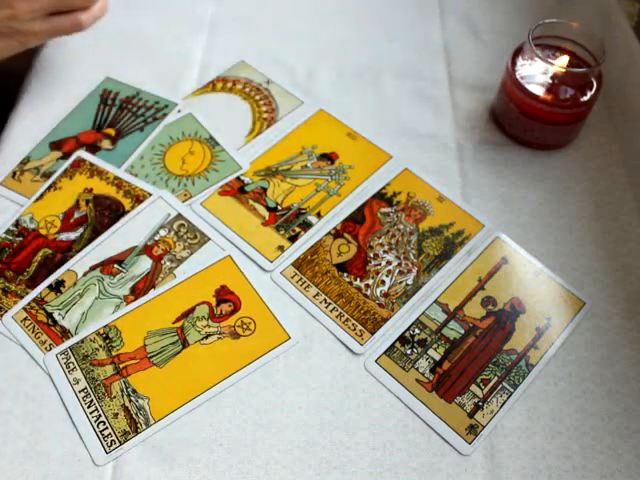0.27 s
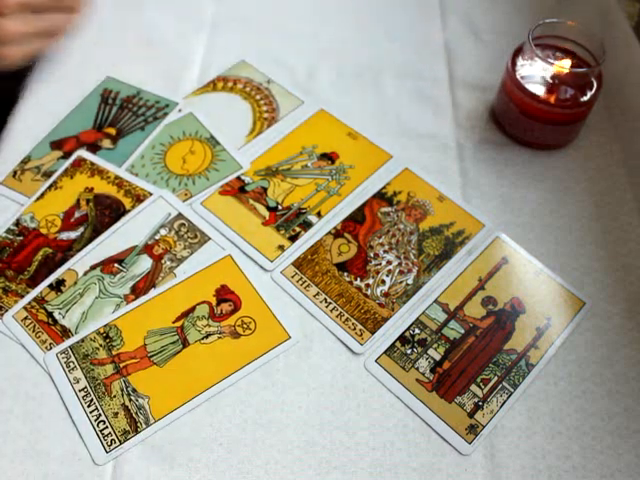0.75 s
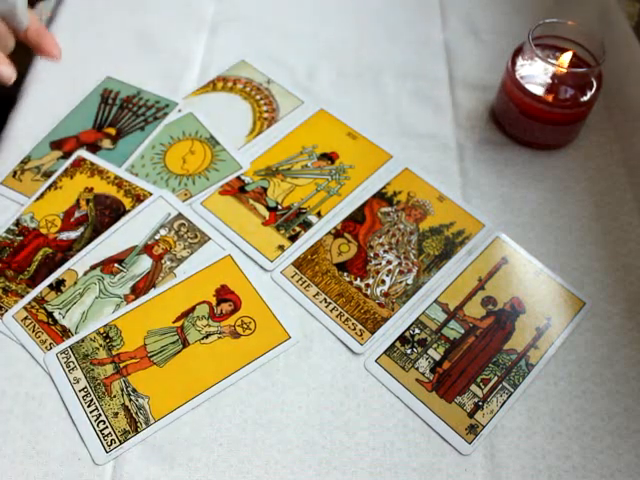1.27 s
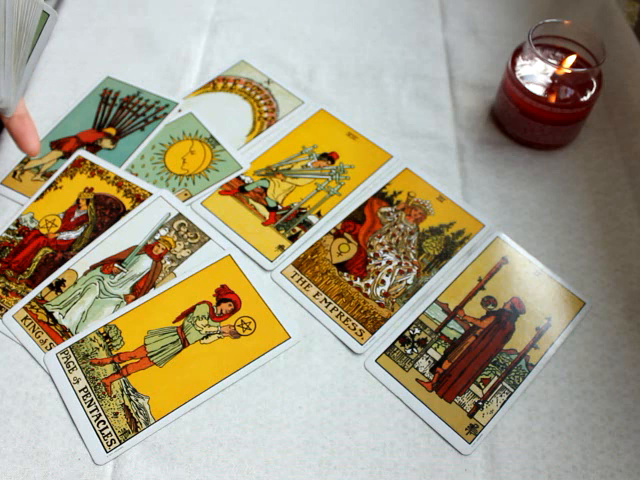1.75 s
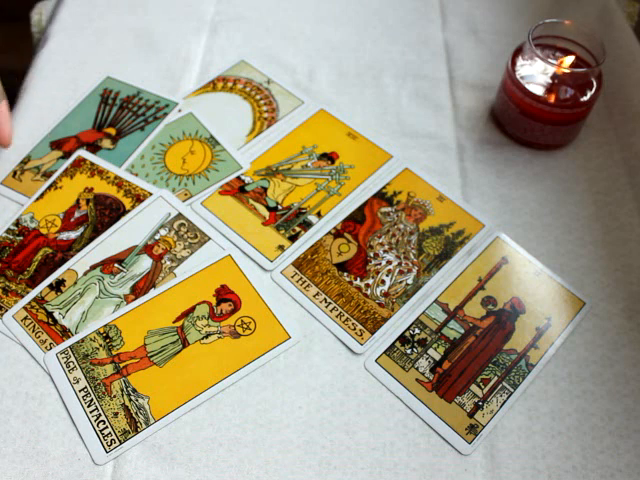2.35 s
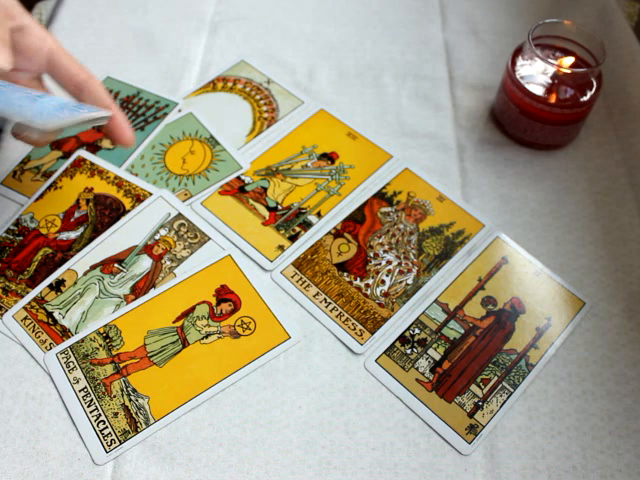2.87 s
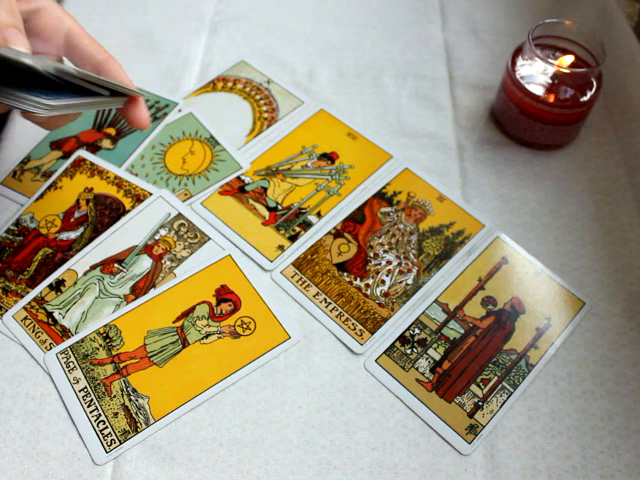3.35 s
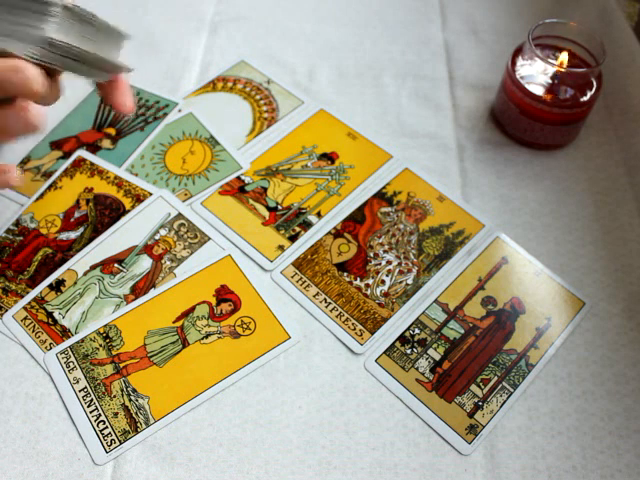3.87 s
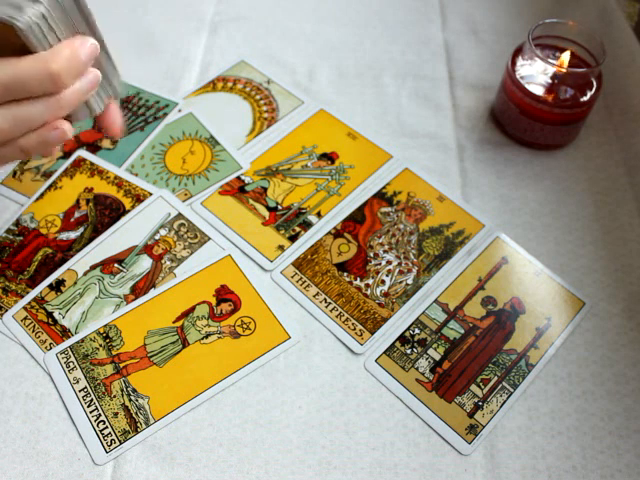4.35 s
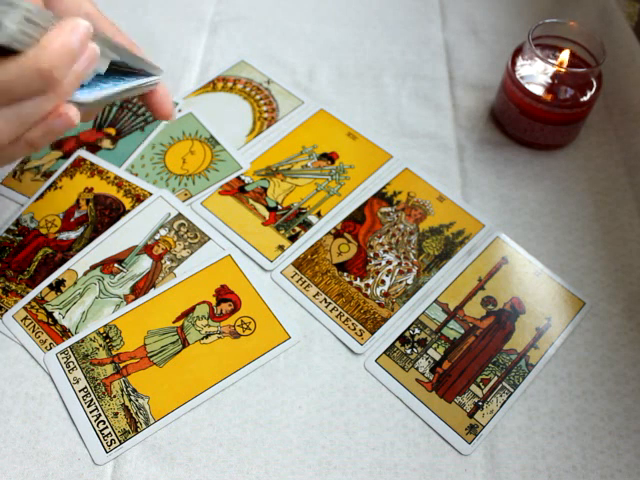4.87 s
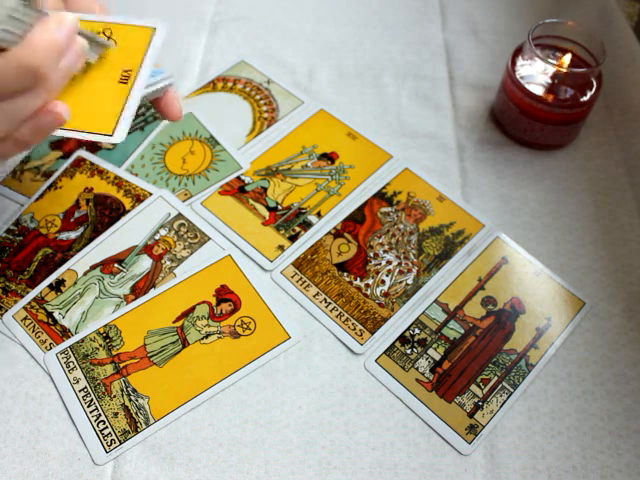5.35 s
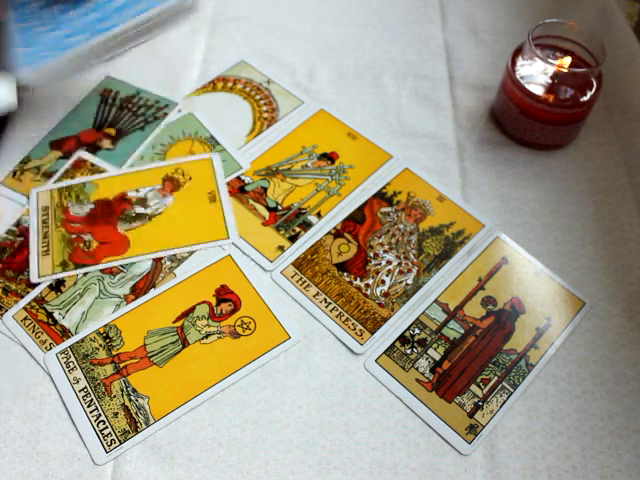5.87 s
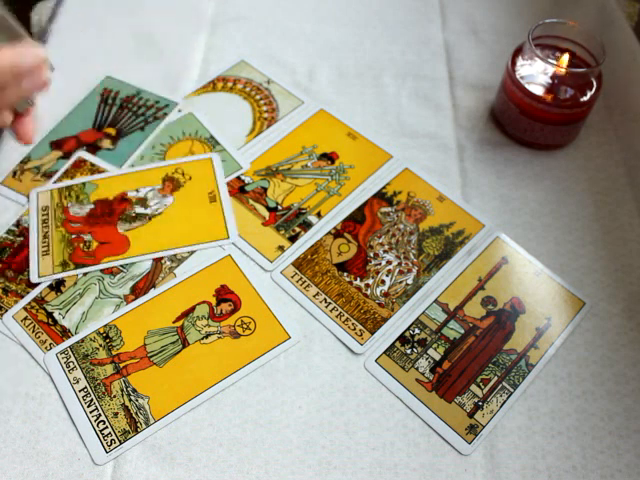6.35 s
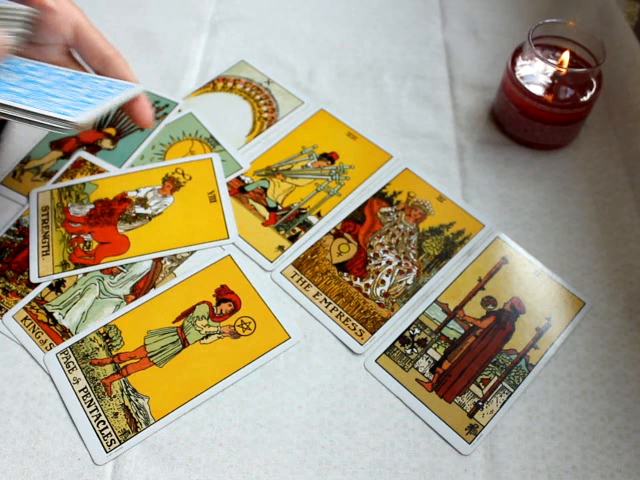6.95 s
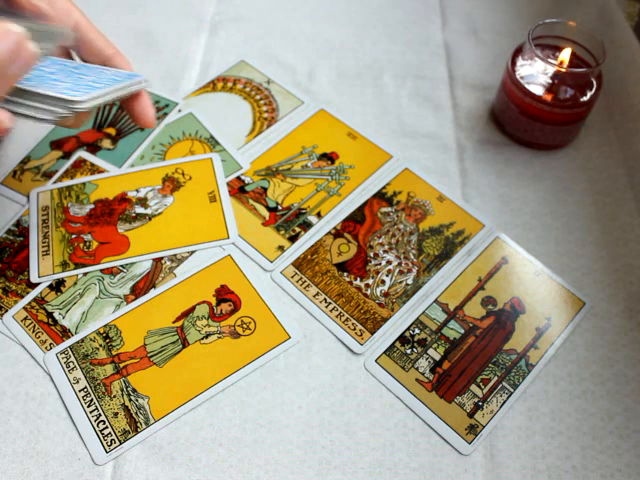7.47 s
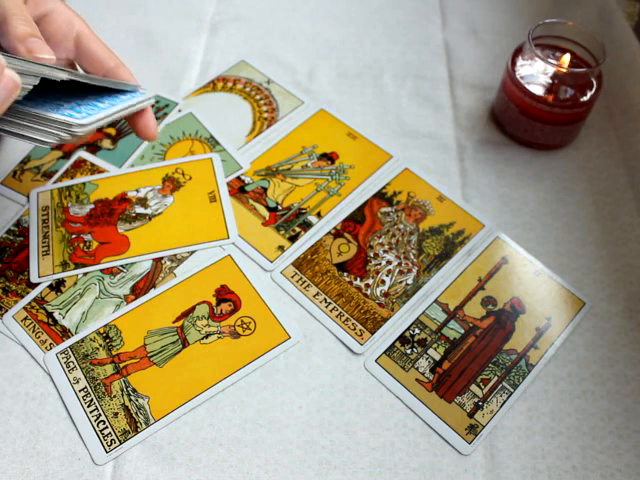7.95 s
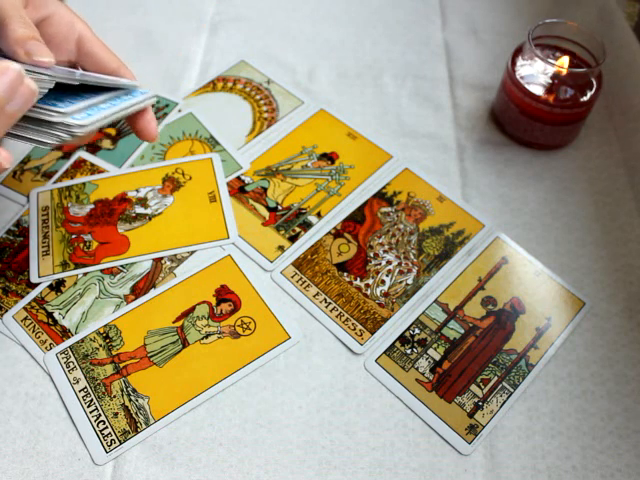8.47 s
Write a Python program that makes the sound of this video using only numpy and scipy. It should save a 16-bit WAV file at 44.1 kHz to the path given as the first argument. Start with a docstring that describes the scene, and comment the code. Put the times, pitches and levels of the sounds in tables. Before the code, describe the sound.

In a small quiet room, a deck of cards is knocked once on a cloth-covered table with a dull woody clack. After faint brushes, packets slide and snap together by hand. One card springs out with a sharp, very loud flick, lands with light ticks, and the shuffling continues softly. The microphone is close, with a short room tail and faint hiss.

```python
"""Tarot cards shuffled over a table.

The deck is knocked once on a cloth-covered table in a small room, then shuffled from hand to hand.
Packets slide (shaped friction noise), edges snap (cracks and short flutter), bent cards pop (narrow-band noise).
One card springs out with a loud flick, a run of snaps, and lands on the spread; the shuffling goes on.
The table rings in decaying modes, a noise tail makes the room, and faint coloured noise is the hiss."""
import sys
import numpy as np
from scipy import signal
from scipy.fft import rfft, irfft
from scipy.io import wavfile
from scipy.ndimage import uniform_filter1d, minimum_filter1d

SR = 44100
rng = np.random.default_rng(int(sys.argv[2]) if len(sys.argv) > 2 else 0)


def put_to_file(sound):
    """Save the sound as 16-bit audio at rate SR, in the file named by the first command-line argument."""
    columns = np.atleast_2d(sound).T  # one column per channel
    safe = np.clip(columns, -1, 1)
    whole_steps = np.round(safe * 32767)
    wavfile.write(sys.argv[1], SR, whole_steps.astype(np.int16))


N = 384111

# packets dropping into the deck: (touch time [s], fall [s], touch level [dB], rub level [dB],
# landing level [dB], brightness [dB/octave], body below about 1 kHz [dB])
PACKET_DROPS = [(3.1039, 0.018, -31.5, -28, -24, 2, -4.5), (3.516, 0.028, -33, -42.5, -36, 1.5, 12.5),
                (3.7208, 0.0093, -38.5, -38, -32.5, 5, -2), (4.907, 0.0084, -45, -38, -18.5, 3.5, 8.5),
                (6.0714, 0.016, -37.5, -28.5, -25, 5.5, 2), (7.113, 0.016, -32.5, -34, -29, 1.5, 3.5),
                (7.3166, .0198, -39, -56, -43.5, 4, -3), (7.5743, 0.012, -38.5, -48, -33.5, 3, 11),
                (8.148, .0146, -29, -57, -26.5, 2, -11), (8.3791, 0.0054, -43, -38, -38, 4, 5)]

EDGES_HZ = np.geomspace(125, 16000, 15)   # half octaves
CENTRES_HZ = np.sqrt(EDGES_HZ[1:] * EDGES_HZ[:-1])
BANK = [signal.butter(2, pair, "band", fs=SR, output="sos") for pair in zip(EDGES_HZ, EDGES_HZ[1:])]
CUTOFF_HZ = 16000

FLICK_S = (5.2327, 5.2596)   # first skip, last skip
FLICK_BODY_DB = (14, -6)     # first skip, last skip


def from_db(db):
    """Decibels to gain."""
    return 10 ** (np.asarray(db) / 20)


def unit(x):
    """Scale to an energy of one."""
    return x / np.sqrt(np.sum(x ** 2, axis=-1, keepdims=True) + 1e-20)


def at_hz(points, hz):
    """Read a spectrum on a log-frequency axis."""
    points = np.array(points)
    return np.interp(np.log(hz), np.log(points[:, 0]), points[:, 1])


def clock(length_s):
    """Sample times over a stretch of seconds."""
    return np.arange(int(length_s * SR)) / SR


def fade(t, t60_s):
    """Exponential decay by 60 dB in t60_s."""
    return np.exp(-np.log(1000) * t / np.maximum(t60_s, 1e-3))


def add(out, start_s, sound):
    """Mix a sound in at a given time."""
    at = max(int(start_s * SR), 0)
    out[at:at + len(sound)] += sound[:len(out) - at]


def bands(force):
    """Split a force into half octaves of equal energy; alternate signs join neighbours smoothly."""
    return unit(np.array([signal.sosfilt(sos, force) * (-1) ** k for k, sos in enumerate(BANK)]))


def coloured(force, band_db, size=2048):
    """A force heard through a body that answers at once (minimum phase), scaled to unit energy."""
    hz = np.maximum(np.fft.rfftfreq(size, 1 / SR), 1)
    band_width_db = 10 * np.log10(np.maximum(hz, CENTRES_HZ[0]))
    per_hz_db = at_hz(np.c_[CENTRES_HZ, band_db], hz) - band_width_db
    cepstrum = irfft(np.log(from_db(per_hz_db)))
    causal = np.r_[cepstrum[0], 2 * cepstrum[1:size // 2]]
    answer = irfft(np.exp(rfft(causal, size)))
    sound = signal.fftconvolve(force, answer)[:len(force)]
    # small things radiate hardly any bass
    band_pass = signal.butter(3, [CENTRES_HZ[0], CUTOFF_HZ], "band", fs=SR, output="sos")
    return unit(signal.sosfilt(band_pass, sound))


def background(level_db=-55.5):
    """Steady room air and microphone hiss: coloured noise with nothing below 20 Hz."""
    # hiss spectrum: (frequency [Hz], relative density [dB per Hz])
    hiss_colour = [(25, -12), (42, -15.5), (65, -19), (100, -20), (165, -12), (205, -15.5), (228, -10.5),
                   (270, -15), (600, -12.5), (1000, -12), (2400, -13), (5000, -16), (10000, -21),
                   (15800, -20)]
    hz = np.maximum(np.fft.rfftfreq(N, 1 / SR), 1)
    gain = from_db(at_hz(hiss_colour, hz)) * (hz > 20)
    noise = irfft(rfft(rng.standard_normal(N)) * gain, N)
    return from_db(level_db) * np.sqrt(N) * unit(noise)


def room(x, first_echo_s=0.0036):
    """Diffuse reflections: a short noise tail with its own level and decay in each band."""
    # tail level: (frequency [Hz], level [dB])
    tail_level = [(150, -7.5), (600, -6), (1600, -7.5), (4000, -7.5), (8000, -10), (14000, -15)]
    # tail decay: (frequency [Hz], t60 [s])
    tail_decay = [(150, 0.21), (1600, 0.24), (4000, 0.22), (8000, 0.2), (14000, 0.2)]
    t = clock(.4)
    build = 1 - np.exp(-(t / first_echo_s) ** 2)
    band_t60_s = at_hz(tail_decay, CENTRES_HZ)[:, None]
    tails = bands(rng.standard_normal(len(t))) * fade(t, band_t60_s) * build
    width_share = np.sqrt(np.diff(EDGES_HZ) / SR)
    band_gain = from_db(at_hz(tail_level, CENTRES_HZ)) * width_share
    return signal.fftconvolve(x, band_gain @ unit(tails))[:N]


def knocks(crack_db=-1.5, clack_db=20, clack_t60_s=0.088, rattle_db=18, rattle_t60_s=0.36,
           damping_hz=3500, build_cycles=1.6):
    """A dull clack of contact, then table modes (low ones build slower) and a dense wooden rattle."""
    # blows that reach the table top: (time [s], level [dB])
    blows = [(0.5013, -15), (5.697, -43)]
    # table-top modes: (frequency [Hz], relative level [dB], t60 [s])
    modes = [(220, -23, 0.24), (238, -11.5, 0.13), (351, -6.5, 0.24), (370.8, -2, 0.21), (484, -15.5, 0.18),
             (528, -5.5, 0.16), (699, -8, 0.12), (876, -6, 0.18), (962, -6.5, 0.22), (1011, 2, 0.16),
             (1170, -10, 0.18), (1213, -10, 0.13), (1270, -22, 0.12), (1259, 1.5, 0.055),
             (1410, -12, 0.089), (1605, -8, 0.096), (1835, -19, 0.26), (1850, -16.5, 0.2),
             (2380, -43, 0.18), (2630, -17.5, 0.11), (2810, -15, 0.074)]
    # contact colour: (frequency [Hz], relative level [dB per half octave])
    clack_colour = [(148, -42), (300, -29), (600, -6.5), (1200, -2.5), (1700, -4.5), (2400, -8.5),
                    (3400, -12.5), (4750, -32), (9500, -46)]
    # rattle colour: (frequency [Hz], relative level [dB per half octave])
    rattle_colour = [(100, -24), (148, -27), (210, -4), (300, 1), (600, 0.5), (1200, 10.5), (1700, 7),
                     (2400, -4), (3400, -36), (9500, -81)]
    out, t = np.zeros(N), clock(.4)
    band_t60_s = rattle_t60_s / (1 + (CENTRES_HZ[:, None] / damping_hz) ** 2)   # wood damps treble first
    for s, db in blows:
        ring = np.zeros(len(t))
        for hz, mode_db, t60_s in modes:
            build = 1 - np.exp(-t * hz / build_cycles)
            tone = np.sin(2 * np.pi * (hz * t + rng.random()))
            ring += from_db(mode_db) * fade(t, t60_s) * build * tone
        contact = unit(rng.standard_normal(len(t)) * fade(t, clack_t60_s))
        contact[0] = from_db(crack_db)
        clack = coloured(contact, at_hz(clack_colour, CENTRES_HZ))
        dying = np.sqrt(np.diff(EDGES_HZ)) @ (bands(rng.standard_normal(len(t))) * fade(t, band_t60_s))
        rattle = coloured(dying, at_hz(rattle_colour, CENTRES_HZ))
        add(out, s, from_db(db) * (ring + from_db(clack_db) * clack + from_db(rattle_db) * rattle))
    return out


def card_colour(brightness_db, body_db):
    """A thin free edge sounds bright; a thick packet adds body."""
    # card colour: (frequency [Hz], relative level [dB per half octave])
    plain_card = [(148, -39.5), (297, -33), (594, -22.5), (1189, -13), (1800, -9), (2400, -6), (3400, -8.5),
                  (4750, -10), (6700, -11.5), (9500, -16.5), (13500, -20)]
    octaves_up = np.maximum(np.log2(CENTRES_HZ / 2500), 0)
    low_share = 1 / (1 + (CENTRES_HZ / 1100) ** 3)
    return at_hz(plain_card, CENTRES_HZ) + brightness_db * octaves_up + body_db * low_share


def all_slides(rise_share=0.34, packet_rub_after_s=0.019, flick_rub_after_s=0.0085):
    """Free strokes and the rubs of packets and flicked card, which outlast the landing or last skip."""
    # cards sliding over each other: (peak time [s], length [s], level [dB], brightness [dB/octave],
    # body below about 1 kHz [dB])
    free_strokes = [(1.273, 0.45, -57.5, 1.5, -10), (1.496, 0.1, -45, -2.5, -5),
                    (3.135, 0.096, -43.5, -2, 4), (3.268, .05, -49, -2, -9), (3.413, 0.13, -48, 0, -1),
                    (3.738, 0.12, -36, 4, 6), (3.883, 0.22, -48.5, 4, 10), (4.197, 0.14, -47.5, 7.5, 3),
                    (4.62, 0.082, -47, 4.5, 2), (5.084, 0.074, -42, 2.5, 1), (5.527, 0.98, -55.5, 1.5, 13),
                    (6.107, 0.053, -28, 2, -6.5), (6.31, 0.13, -50, 4, 4), (6.816, .08, -38.5, 4.5, -17),
                    (7.294, 0.24, -51.5, 1.5, 14), (8.134, 0.18, -48.5, 1, 15)]
    strokes = [(peak - rise_share * length, peak, peak + (1 - rise_share) * length, *sound)
               for peak, length, *sound in free_strokes]
    rubs = [(s, s + fall, s + fall + packet_rub_after_s, rub_db, brightness_db, body_db)
            for s, fall, _, rub_db, _, brightness_db, body_db in PACKET_DROPS]
    # start, peak, end [s], level [dB], brightness [dB/octave], body [dB]
    flick = (*FLICK_S, FLICK_S[1] + flick_rub_after_s, -14, -6, FLICK_BODY_DB[1])
    return strokes + rubs + [flick]


def slides(catches_per_s=4000, spread_db=6.0, smooth=0.43, edge_db=17, uneven_db=3.5, grips_per_s=250):
    """Card faces rub with a smooth hiss and catch in tiny slips; the stroke swells unevenly and dies."""
    out = np.zeros(N)
    grips_s = np.arange(0, N / SR, 1 / grips_per_s)
    grip_db = uneven_db * rng.standard_normal(len(grips_s))
    pressure = from_db(np.interp(np.arange(N) / SR, grips_s, grip_db))
    hiss, size = rng.standard_normal((2, N))
    caught = rng.random(N) < catches_per_s / SR
    slips = caught * from_db(spread_db * np.clip(size, -2, 2)) * rng.choice([-1, 1], N)
    friction = (slips + smooth * hiss) * pressure
    for start, peak, end, db, brightness_db, body_db in all_slides():
        t = start + clock(max(end - start, .01))
        speed = np.interp(t, [start, peak, end], [0, 1, 0])
        loudness = from_db(edge_db * (speed - 1)) - from_db(-edge_db)
        stroke = np.sqrt(speed * loudness.clip(0))
        force = stroke * friction[int(start * SR):][:len(t)]
        rub = coloured(force, card_colour(brightness_db, body_db))
        add(out, start, from_db(db) * np.linalg.norm(stroke) * rub)
    return out


def all_flexes(pop_cycles=28, t60_per_swell=2.6, ring_db=-56, ring_follows=0.36,
               ring_swell_s=0.024, ring_t60_s=0.28):
    """A bent card pops straight, then the air between the cards rings on at the same pitch."""
    # pops: (peak time [s], swell [s], frequency [Hz], level [dB])
    bent_cards = [(3.105, 0.00094, 1704, -28.5), (3.17, .03, 1627, -44.5), (3.43, 0.031, 3290, -51),
                  (3.546, .025, 691, -46.5), (4.918, 0.0031, 2115, -25), (4.986, 0.0039, 1660, -42),
                  (5.061, .011, 1920, -44), (5.2599, 0.0049, 1519, -3), (5.587, 0.0029, 918, -44.5),
                  (5.657, 0.022, 1108, -49.5), (5.6931, 0.00097, 2760, -18), (5.698, .004, 1056, -19),
                  (6.83, .02, 3100, -42), (7.196, 0.0041, 1875, -40), (7.318, 0.00194, 824, -41),
                  (7.319, .0027, 1855, -29.5), (8.105, .027, 840, -54), (8.149, .001, 3590, -23.5)]
    # a slowly bent card also dies later
    pops = [(s, swell, pop_cycles / hz + t60_per_swell * swell, hz, db) for s, swell, hz, db in bent_cards]
    # ring_db follows a -30 dB pop; ring_follows is dB of ring per dB of pop
    rings = [(s + ring_swell_s, ring_swell_s, ring_t60_s, hz, ring_db + ring_follows * (db + 30))
             for s, _, hz, db in bent_cards]
    return pops + rings


def flexes(width_share=.15, rough=.7):
    """A bent card has one broad resonance that swells as it is pushed and dies when it is let go."""
    out = np.zeros(N)
    for peak, swell, t60_s, hz, db in all_flexes():
        t = clock(swell + t60_s + .01)
        shape = np.minimum(t / max(swell, 1e-4), 1) * fade(np.maximum(t - swell, 0), t60_s)
        pole = np.exp(-np.pi * width_share * hz / SR)
        noise = rng.standard_normal(len(t)) + 1j * rng.standard_normal(len(t))
        jitter = signal.lfilter([np.sqrt((1 - pole ** 2) / 2)], [1, -pole], noise)
        wander = jitter / (np.abs(jitter) + 1e-9) ** (1 - rough)   # evens out the amplitude in part
        tone = np.real(wander * np.exp(2j * np.pi * hz * t))
        add(out, peak - swell, from_db(db) * np.sqrt(2) * shape * tone)
    return out


def flick_skips(count=6, level_db=(-16, -6), brightness_db=(1, -5), thump_fade=2.5):
    """Even skips of the edge grow louder and duller as the card comes free; the deck's thump fades fast."""
    along = np.linspace(0, 1, count)
    thump_gone = 1 - np.exp(-thump_fade * along)
    return list(zip(np.interp(along, [0, 1], FLICK_S),
                    np.interp(along, [0, 1], level_db),
                    np.interp(along, [0, 1], brightness_db),
                    np.interp(thump_gone, [0, 1], FLICK_BODY_DB)))


def all_snaps(touch_duller_db=1.5, landing_brighter_db=1.5, t60_s=.016, doubling_db=24):
    """Single snaps, flick skips and two contacts per packet; thick packets flutter longer than edges."""
    # single edges snapping free: (time [s], level over 4 ms [dB], brightness [dB/octave],
    # body below about 1 kHz [dB])
    single_edges = [(0.973, -49, 1, -12), (1.5777, -44, -0.5, -6), (2.0136, -47.5, 6, 6),
                    (3.181, -37.5, -0.5, -8), (5.1902, -36.5, -4, 10), (5.244, -11, 1.5, -3.5),
                    (5.2751, -18, -1.5, 3), (5.3105, -32, 4, 12), (5.4336, -33.5, -1.5, -3),
                    (5.5293, -48, 4, 0), (5.5864, -46, 2, 9), (5.6915, -22.5, -2, -11),
                    (5.6967, -25.5, -3, -5), (5.7372, -33.5, -2, -15), (5.7883, -31.5, 5, 6),
                    (5.8222, -27, 2, -12), (6.1085, -31, 2, 16), (6.3134, -44, 3, -2),
                    (6.7897, -41, 3.5, 7), (7.195, -41.5, -4, -16), (7.2434, -38, 1.5, -20),
                    (8.176, -37, 10, 34)]
    rows = [*single_edges, *flick_skips()]
    for s, fall, touch_db, _, landing_db, brightness_db, body_db in PACKET_DROPS:
        rows.append((s, touch_db, brightness_db - touch_duller_db, body_db))
        rows.append((s + fall, landing_db, brightness_db + landing_brighter_db, body_db))
    return [(s, db, brightness_db, body_db, t60_s * 2 ** (body_db / doubling_db))
            for s, db, brightness_db, body_db in rows]


def snaps(crack_db=-5.0, crack_lag_s=.0004):
    """An edge lets go with one sharp crack, and the stiff card flutters for a few milliseconds."""
    out, t = np.zeros(N), clock(.05)
    level_span = np.sqrt(.004 * SR)   # levels are over 4 ms
    for s, db, brightness_db, body_db, t60_s in all_snaps():
        force = unit(rng.standard_normal(len(t)) * fade(t, t60_s))
        force[np.argmax(t > crack_lag_s)] = from_db(crack_db) * rng.choice([-1, 1])
        add(out, s, from_db(db) * level_span * coloured(force, card_colour(brightness_db, body_db)))
    return out


def scene(bass_edge_hz=195):
    """Cards close to the microphone with their room tail, the table and the hiss."""
    high_pass = signal.butter(4, bass_edge_hz, "high", fs=SR, output="sos")
    cards = signal.sosfilt(high_pass, snaps() + slides() + flexes())
    return (cards + room(cards) + knocks() + background())[None]


def record(dry, limit_db=-2.0, release_db_per_s=36, zero_offset=.001):
    """A limiter ducks just ahead of peaks and recovers slowly; the top is cut, the signal rests off zero."""
    ramp_db = release_db_per_s * np.arange(N) / SR
    over_db = np.maximum(20 * np.log10(np.abs(dry[0]) + 1e-9) - limit_db, 0)
    gain_db = ramp_db - np.maximum.accumulate(over_db + ramp_db)
    gain_db = uniform_filter1d(minimum_filter1d(gain_db, size=32), size=32)
    low_pass = signal.ellip(12, .1, 80, CUTOFF_HZ, fs=SR, output="sos")
    return signal.sosfilt(low_pass, dry * from_db(gain_db)) + zero_offset


dry = scene()
out = record(dry)
put_to_file(out)
```